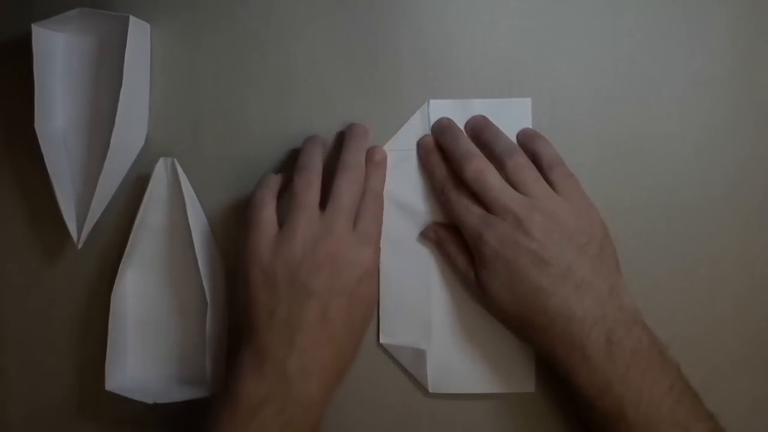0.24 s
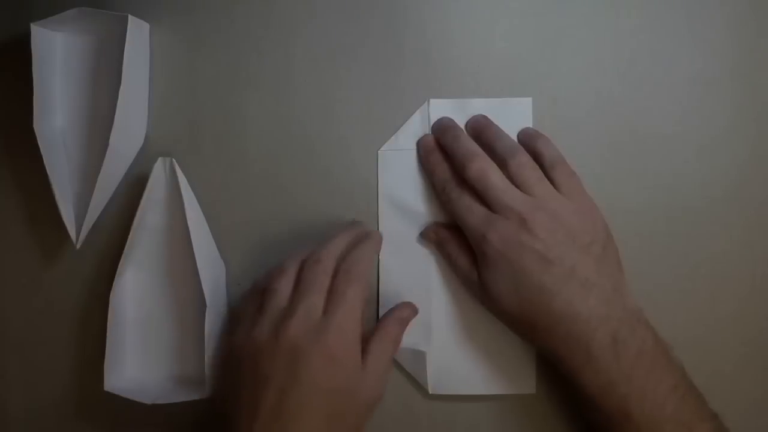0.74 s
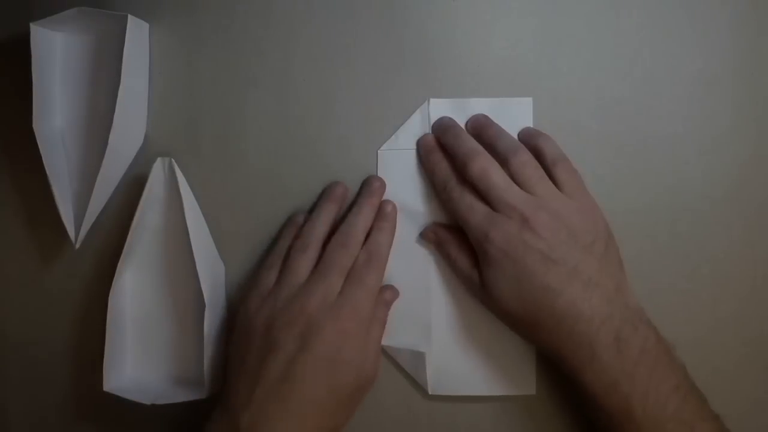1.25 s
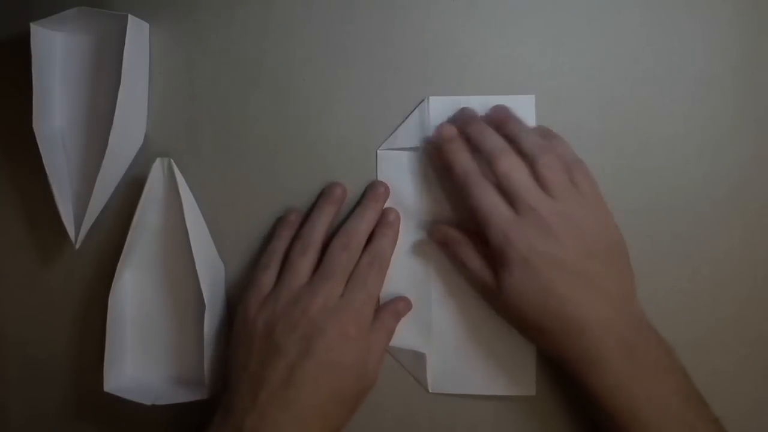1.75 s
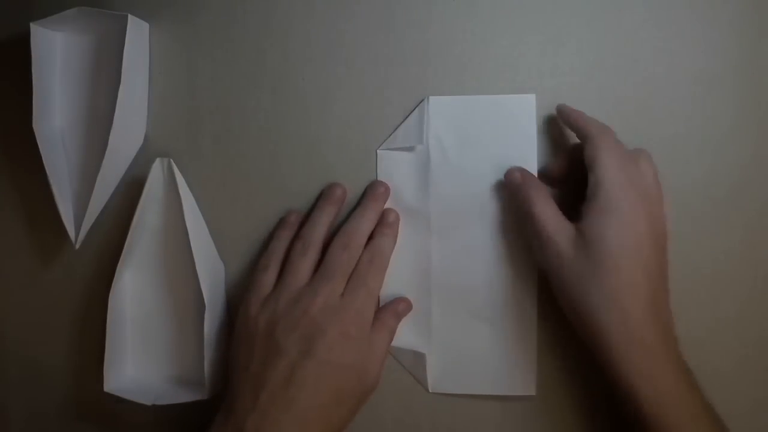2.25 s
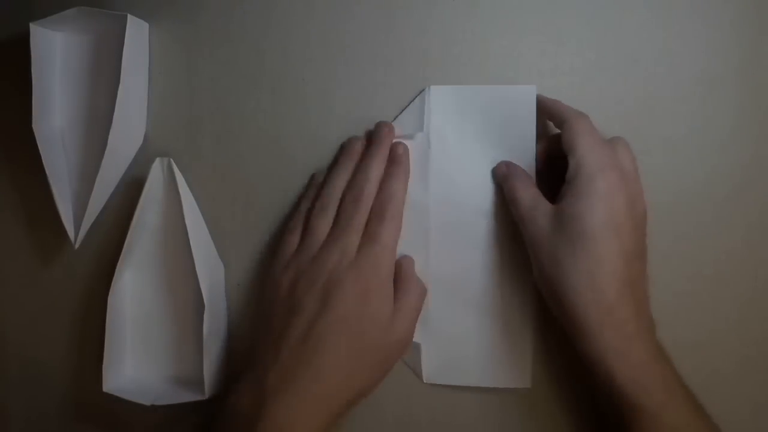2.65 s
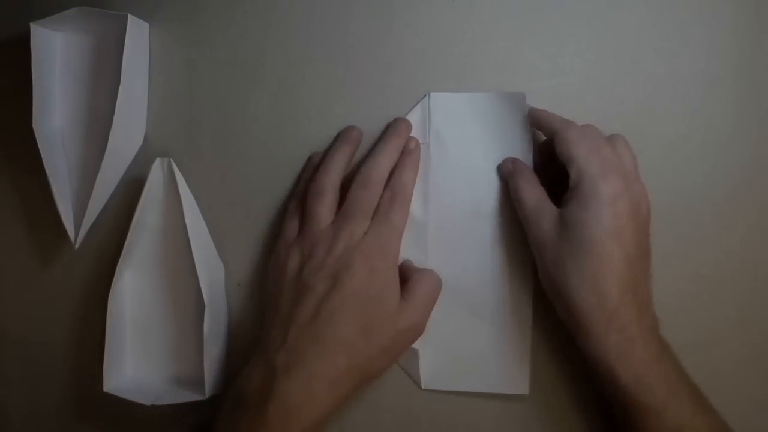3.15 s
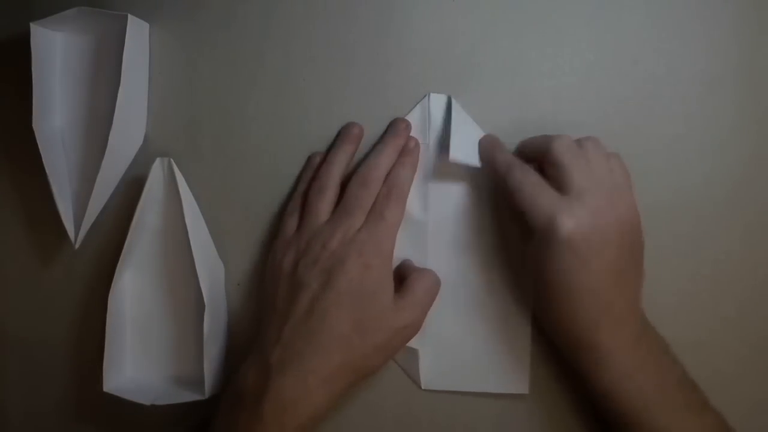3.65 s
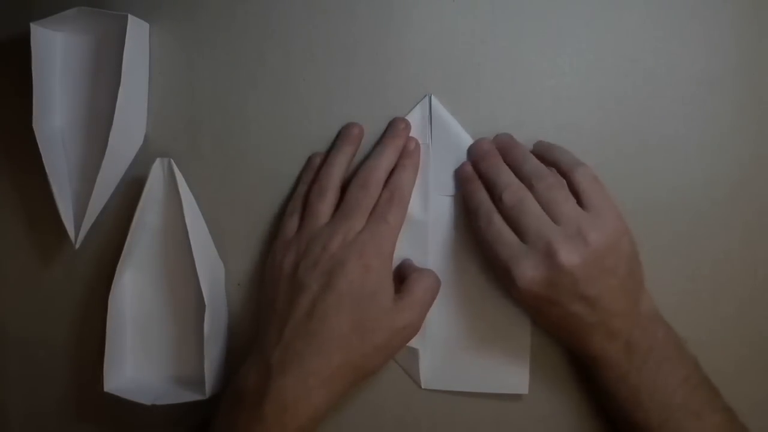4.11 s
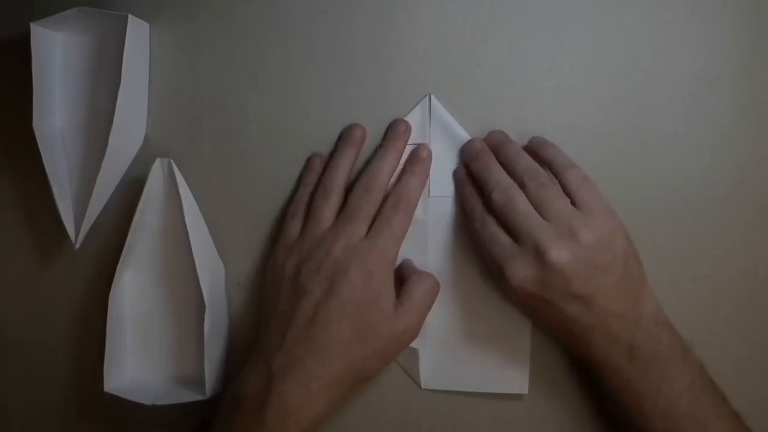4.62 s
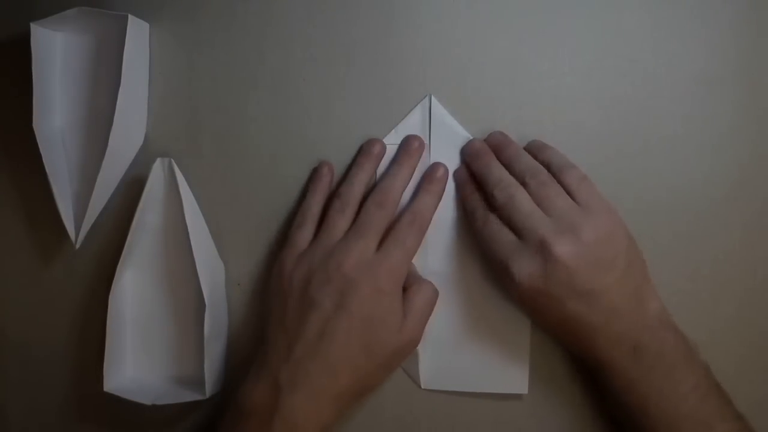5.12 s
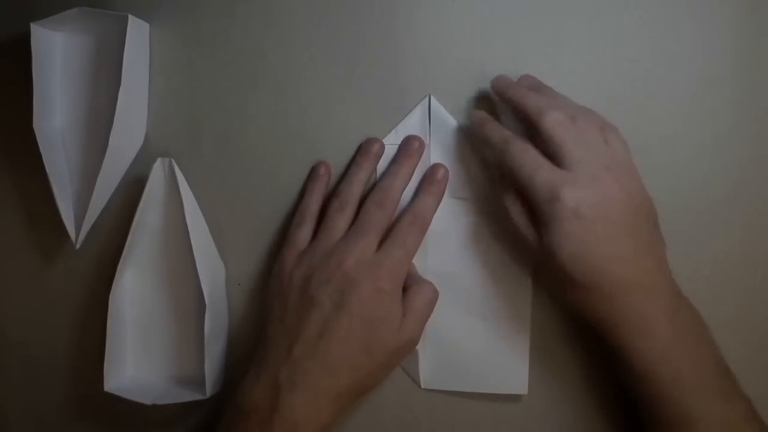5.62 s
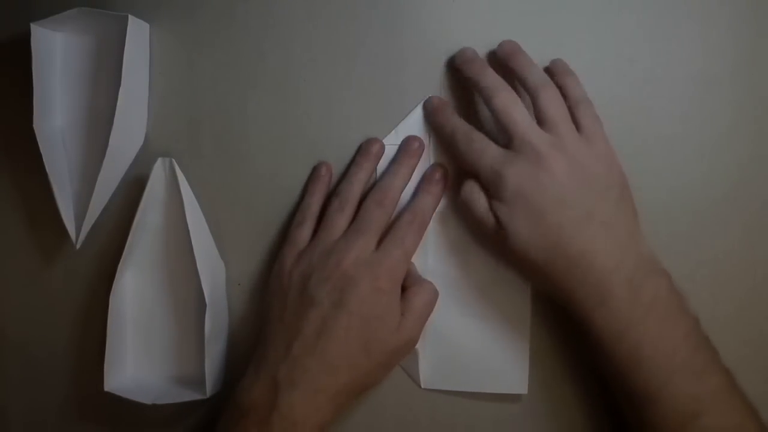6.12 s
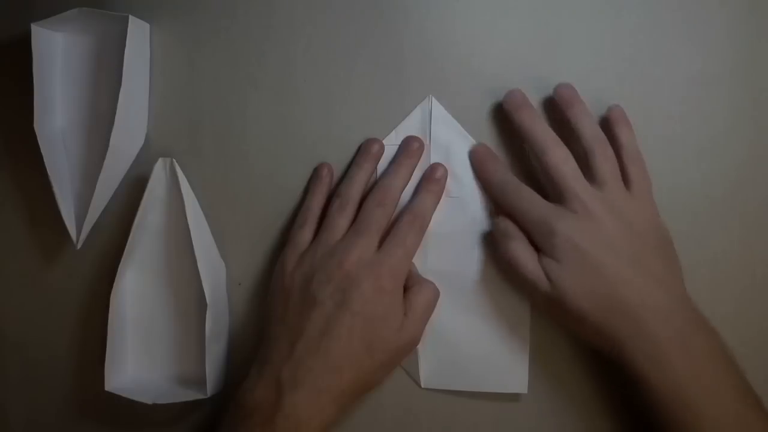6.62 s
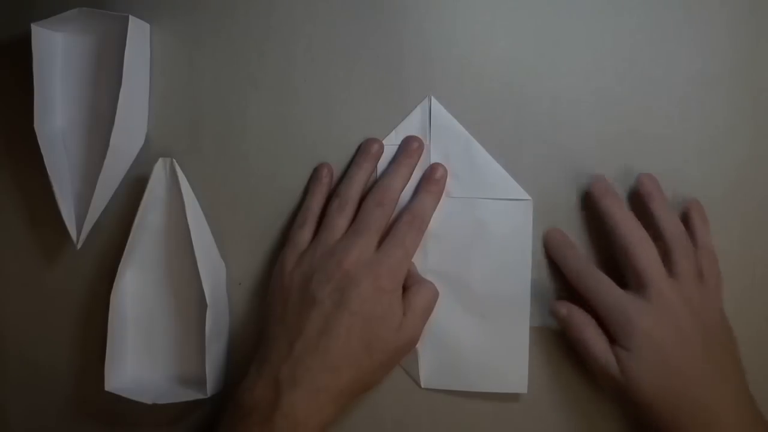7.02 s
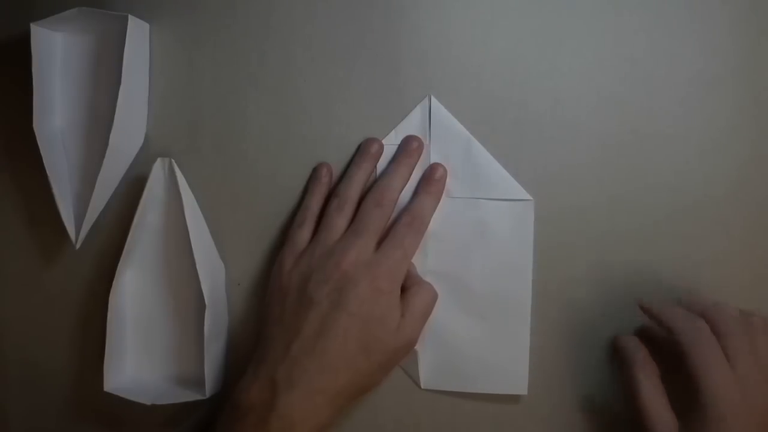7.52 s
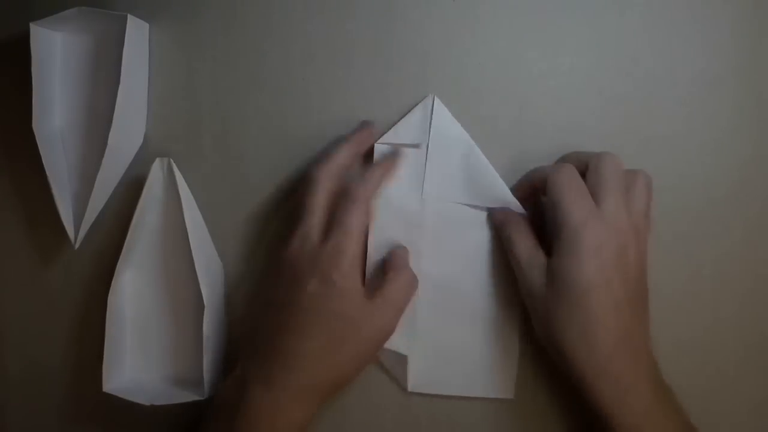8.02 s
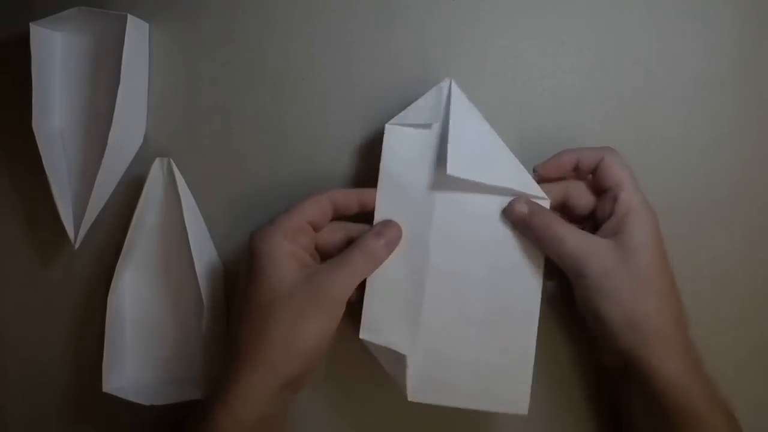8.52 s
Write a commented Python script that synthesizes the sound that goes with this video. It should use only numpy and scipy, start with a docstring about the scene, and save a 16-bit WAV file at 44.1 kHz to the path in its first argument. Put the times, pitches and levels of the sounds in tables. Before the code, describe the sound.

Hands fold a sheet of paper on a table. Skin slides over it in irregular, finely hissing strokes while fingertips thump the table top softly. A crease buckles with a sharp snap, followed by a faint thin whistle and small crackles. Two more sharp snaps come later, the last leading into a long slide and short finishing strokes. The sound is close, over a low room rumble and soft microphone hiss.

```python
"""Hands fold a sheet of paper on a table, while the room rumbles and the microphones hiss softly.
First, skin slides over the paper with a fine hiss and fingertips thump the table top.
Near 1.8 s a crease buckles with a sharp snap; a thin whistle and small crackles follow.
Another sharp snap at 3.9 s leads into lighter rubbing. At 6.5 s a snap and a thump start a long
slide, and short strokes and small snaps finish the folding."""
import sys
import numpy as np
from scipy import signal
from scipy.fft import rfft, irfft, next_fast_len
from scipy.io import wavfile
from scipy.ndimage import uniform_filter1d, map_coordinates

SR = 44100
rng = np.random.default_rng(int(sys.argv[2]) if len(sys.argv) > 2 else 0)


def put_to_file(sound):
    """Save the sound as 16-bit audio at rate SR, in the file named by the first command-line argument."""
    columns = np.atleast_2d(sound).T  # one column per channel
    safe = np.clip(columns, -1, 1)
    whole_steps = np.round(safe * 32767)
    wavfile.write(sys.argv[1], SR, whole_steps.astype(np.int16))


N = 386316

# Strokes over the paper: t/s on reaching full level, rise/s, hold/s, fall/s, hiss level/dB,
# then, compared with that hiss: lower hiss/dB, sheet flutter/dB, table drone/dB
STROKES = [(.01, 0.027, .01, .04, -60, -5, -7, -10), (0.207, .1, .02, 0.056, -65.5, -5, -7, 11.5),
           (0.284, 0.053, 0.067, .06, -51.5, -9, -10, -4), (0.369, .08, 0.08, 0.028, -48, -9.5, -8, -3),
           (.844, .05, .004, 0.037, -53.5, -1, -15, -17), (0.918, 0.09, 0.047, .11, -64, 0, -2, 10),
           (1.334, 0.015, .035, .07, -54, -2, 3.5, 7.5), (1.494, .07, 0.13, .03, -55.5, -17, -8, -5),
           (1.728, 0.042, .005, 0.027, -40, -6, -13, -11.5), (1.758, .005, .003, 0.085, -48, 5, -7, 8),
           (2.16, 0.034, 0.034, .05, -57, -6, 4.5, 7.5), (2.225, 0.096, .01, 0.048, -49.5, -4, 2.8, -9),
           (2.324, 0.14, 0.065, 0.17, -56, -1, 0.8, -0.5), (2.443, 0.019, 0.06, 0.034, -42.5, -8, -4, -12),
           (2.533, .03, 0.045, 0.29, -49.5, -18, -2.5, -2.5),
           (2.688, 0.055, 0.0034, 0.034, -35, -5, -8.5, -12.5),
           (2.794, 0.15, 0.064, 0.14, -48.5, -2.5, -1, -5.5),
           (2.948, 0.052, .004, 0.039, -43, -5, -4.5, -12), (3.044, 0.048, 0.0092, .15, -53, 1.5, -9, -3),
           (3.22, .02, .003, 0.035, -59, -6, -11, 0), (3.328, 0.014, .004, 0.08, -38.5, -8.5, -0.5, -6.5),
           (3.388, .05, .004, 0.04, -45, -8, -3, -15), (3.444, .008, 0.046, .11, -45, -10, -7.5, -14),
           (3.521, 0.095, 0.012, 0.036, -38.5, -6.5, -27, -26),
           (3.58, 0.034, 0.0037, 0.068, -51, 4.5, 6.8, 6),
           (3.688, 0.026, 0.0088, 0.065, -41.5, -13, -13, -25),
           (3.827, 0.12, .004, 0.052, -53.5, -5, -4, -12), (3.903, .005, .004, 0.12, -45, -3, 4, -7),
           (4.042, .04, 0.025, 0.19, -53, -5.5, -2.2, -10), (4.152, 0.05, .004, 0.13, -53, -7, -3, -15.5),
           (4.254, .03, .004, .06, -54, -14, -18, -9), (4.345, .03, 0.046, .11, -55.5, -6.5, -5, -9),
           (4.456, .05, 0.056, 0.34, -49.5, -7.5, -6, -14), (4.747, 0.061, .004, .06, -49, -6, -6, -19),
           (4.878, 0.18, .004, 0.072, -44.5, -12, -7.5, -8.5),
           (5.044, 0.061, .004, 0.048, -60.5, -11, 9, 2.2),
           (5.194, 0.085, .01, 0.078, -48.5, -1, -6.5, -24), (5.345, .11, .01, 0.056, -50, -5.5, -12, -13),
           (5.4, .005, 0.0067, .03, -39.5, -12, -19, -21), (5.447, 0.045, .015, 0.047, -56, 0, -16, -11),
           (5.753, .008, .02, .03, -45, -6.5, -11, -10), (5.788, 0.035, 0.034, 0.037, -36, -14.5, -23, -25),
           (5.844, .03, .08, 0.071, -42.5, -4, -19.5, -20), (5.985, .06, .008, 0.014, -38.5, -4, -16, -23),
           (6.01, 0.039, 0.061, 0.056, -55, 4.5, -.8, 1), (6.364, .07, 0.097, .03, -45, -5, -17, -13),
           (6.47, 0.009, .004, 0.11, -37.5, -15, -4, 1), (6.553, 0.15, .004, 0.24, -37, -5, -9, -12.5),
           (6.66, .11, 0.14, .4, -42.5, -15, -19, -14), (6.9, 0.14, .11, 0.064, -48.5, -5.5, -2.5, -1),
           (7.04, .03, 0.036, 0.044, -52, -9, -2, 3.5), (7.097, .05, 0.026, .03, -46.5, -5.5, -13, -17),
           (7.644, 0.0045, .004, 0.037, -42.5, -13, -25, -13), (7.845, 0.29, 0.044, .11, -54, -7, -2.5, 0),
           (7.926, 0.053, .004, 0.073, -46, -6, -6, -5), (7.97, .05, .02, .02, -46.5, -5, -7, -6),
           (7.995, .012, 0.017, 0.041, -34.5, -2, -12, -24), (8.062, 0.055, .004, .15, -49, -2.5, -6, -12),
           (8.193, 0.08, 0.014, 0.13, -44, 0, -1.2, -20.5),
           (8.326, 0.096, .15, 0.065, -44.5, -4.5, -4.5, -8.5),
           (8.53, 0.045, .004, 0.049, -43.5, 1.2, -6, -20), (8.565, 0.022, 0.066, .04, -54, -2, -4, 5.5),
           (8.686, 0.017, .004, 0.058, -52.5, -14, -11, 8.5)]
def stroke_gains():
    """Loudness of the four sliding layers: each stroke swells, holds and fades; overlaps add in power."""
    swing_db = 20  # gained over one rise time, lost over one fall time
    t, power = np.arange(0, N + 64, 64) / SR, 0
    for start, rise, hold, fall, db, *relative_db in STROKES:
        before = (start - t) / max(rise, 1e-3)
        after = (t - start - abs(hold)) / max(fall, 1e-3)
        drop_db = swing_db * np.maximum(before, after).clip(0, 8)
        power = power + amp(db + np.array([0, *relative_db])[:, None] - drop_db) ** 2
    return [np.interp(np.arange(N) / SR, t, np.sqrt(row)) for row in power]


# Tone of the skin's hiss, its lower part, the fluttering sheet and the droning table: f/Hz, level/dB
SKIN_HISS = [(2650, -37), (4500, -9), (7260, 1.5), (8780, 2.5), (13400, -1.5), (15100, -7.5), (15900, -14),
             (16200, -18), (16500, -57)]
LOWER_HISS = [(2500, -15), (3500, -5.5), (4500, -2), (6000, -6.5), (8000, -11.5)]
SHEET_FLUTTER = [(700, -8), (1200, -1), (2000, -3), (3300, -4.5), (5000, -6)]
TABLE_DRONE = [(120, 3), (250, 1), (600, -0.5), (1100, -6.5), (1800, -41.5)]
# How alike the paper sounds left and right: f/Hz, likeness (1 = the same)
PAPER_ALIKE = [(300, 1), (1400, 0.69), (3100, 0.62), (7000, 0.3), (15000, 0.029)]
def sliding():
    """Skin catches on paper fibres in tiny slips; the stroke also shakes the sheet and the table."""
    slips = amp(0.78 * wobble(700) + 0.8 * wobble(60))
    hiss = unit(slips * rush(SKIN_HISS, PAPER_ALIKE, patchy_db=1.4))
    lower = unit(slips * rush(LOWER_HISS, PAPER_ALIKE, patchy_db=3.0))
    flutter = unit(slips * rush(SHEET_FLUTTER, PAPER_ALIKE, patchy_db=2.5))
    drone = rush(TABLE_DRONE, PAPER_ALIKE, patchy_db=3.0)
    return sum(gain * layer for gain, layer in zip(stroke_gains(), (hiss, lower, flutter, drone)))


SCATTER_DB = 1.5  # how much each ringing note varies from one snap or thump to the next
# Notes at which the folded sheet rings: f/Hz, level/dB, time to fade by 60 dB/s
SHEET_NOTES = [(534, -17, .04), (825, 4.5, 0.081), (1056, 4.5, 0.029), (1480, 11, 0.01), (1890, -4, 0.025),
               (2255, 0.5, 0.029), (2930, -2, 0.019)]
# Snapping creases: t/s, crack level/dB, ring over crack before its lift/dB,
# ring f/Hz, crack f/Hz, crack fade time/s
SNAPS = [(0.117, -37.5, -26, 1020, 10100, 0.0077), (0.205, -29.5, -13, 1020, 11200, 0.0087),
         (0.815, -45, -17, 966, 6190, 0.006), (1.327, -39, -19, 950, 11400, 0.0053),
         (1.351, -23, -6, 1430, 2630, 0.018), (1.5014, -46.5, -2, 1050, 10100, 0.006),
         (1.701, -32.5, -16, 1700, 5230, 0.006), (1.7557, -9, -22, 1550, 8000, 0.0085),
         (2.156, -41, -5, 2340, 6870, 0.0054), (2.481, -36, -25, 1570, 8430, 0.006),
         (2.497, -26, -24, 1340, 8450, 0.006), (2.51, -35.5, 2.5, 1150, 8560, 0.0066),
         (2.65, -41, -24, 2180, 11500, 0.006), (2.786, -30, -30, 950, 7590, 0.007),
         (2.808, -25.5, -26, 980, 8280, 0.0048), (2.821, -43, 3.5, 820, 3000, .006),
         (2.837, -24.5, -7.5, 2150, 2510, 0.0016), (3.052, -29, -15, 2410, 8300, 0.0067),
         (3.2195, -32.5, -25, 1060, 7100, 0.0063), (3.3236, -29, -12.5, 1180, 4130, 0.0093),
         (3.325, -22.5, -8.5, 1830, 10700, 0.0098), (3.44, -37, -21, 1870, 8260, 0.006),
         (3.575, -30.5, -18, 2100, 4130, 0.0062), (3.594, -38, -0.5, 2410, 3500, 0.0053),
         (3.9003, -8.5, -15, 1560, 6200, 0.013), (4.16, -29, -34, 1300, 10200, 0.006),
         (4.252, -32.5, -29, 1050, 10300, 0.011), (5.039, -41.5, -11, 1110, 8110, 0.0073),
         (5.3951, -26, -35.5, 950, 10800, 0.0085), (5.995, -33, -11.5, 1070, 6450, 0.006),
         (6.027, -29.5, -15, 1850, 4100, 0.0096), (6.4738, -13.5, -11.5, 1430, 6060, 0.016),
         (6.553, -22, -22, 1240, 8170, 0.006), (6.604, -28.5, -11, 1010, 9750, 0.006),
         (7.005, -29, -24, 2300, 5000, 0.0048), (7.532, -42, -13, 1020, 8600, 0.006),
         (7.643, -24.5, -29, 1010, 6950, 0.011), (7.778, -40, -0.5, 1550, 3400, 0.008),
         (7.902, -31, -17, 1380, 8730, 0.0066), (7.9194, -29.5, -24, 1040, 12700, 0.016),
         (7.993, -29, -23, 2250, 8690, 0.006), (8.052, -37, -20, 1500, 5000, .006),
         (8.4165, -41, -1.5, 1500, 9420, 0.006), (8.529, -24.5, -19, 1050, 7400, 0.0074),
         (8.5454, -26.5, 3, 1090, 4000, 0.014), (8.692, -37, 1.5, 1400, 3900, 0.0069)]
def snaps():
    """A crease buckles: a broad crack, and a brief ring of the sheet's notes near the ring frequency."""
    ring_lift_db = 5.5
    out, t = np.zeros((2, N + SR)), np.arange(SR // 10) / SR
    for start, db, ring_db, ring_hz, crack_hz, crack_fade in SNAPS:
        common, left, right = rng.standard_normal((3, len(t)))
        decay = amp(-60 * t / max(crack_fade, 1e-3)) + 0.81 * amp(-60 * t / 0.00059)
        attack = 1 - np.exp(-t / 0.0001)
        burst = (common + 0.85 * np.array([left, right])) * decay * attack
        crack = filtered(burst, lambda hz: resonance(hz, crack_hz, 0.87 * crack_hz)
                         * resonance(hz, centre_hz=5160, width_hz=7900))
        ring = 0
        for hz, level, fade in SHEET_NOTES:
            note_db = level + rng.normal(0, SCATTER_DB) - 18 * abs(np.log2(hz / ring_hz))
            note_hz = hz * (1 + rng.normal(0, 0.043))
            ring += amp(note_db - 60 * t / fade) * np.sin(2 * np.pi * note_hz * t)
        crack /= np.abs(crack.mean(0)).max()
        ring *= amp(ring_db + ring_lift_db) / np.abs(ring).max()
        out[:, round(start * SR):][:, :len(t)] += amp(db) * (crack + ring)
    return out[:, :N]


# Notes at which the table top rings: f/Hz, level/dB, time to fade by 60 dB/s
TABLE_NOTES = [(108, 3.5, .12), (161, 5.5, 0.064), (220, 6, 0.054), (315.6, 4.5, 0.062), (469, -4.5, 0.12),
               (548.5, 0.5, 0.048), (730, -14, .05), (873, -18.5, 0.038)]
# Fingertips landing: t/s, peak level/dB, sharpness/dB per octave above 200 Hz
THUMPS = [(0.115, -32.5, -1.5), (0.205, -40.5, 2), (0.438, -28, -3), (1.351, -32, 4.5),
          (1.502, -38.5, -1.5), (1.753, -29, 2.5), (2.512, -38, -9), (3.055, -38.5, -12), (3.221, -39, -7),
          (3.804, -42, 0), (3.9, -37.5, -1), (5.612, -38, -11), (6.003, -37.5, 1), (6.026, -36.5, 0.5),
          (6.472, -24.5, 8), (6.603, -32, -4), (7.994, -36, -7)]
def thumps():
    """A fingertip makes the table ring; sharper blows bring out the higher notes."""
    out, t = np.zeros(N + SR), np.arange(SR // 4) / SR
    for start, db, sharp_db in THUMPS:
        ring = 0
        for hz, level, fade in TABLE_NOTES:
            note_db = level + rng.normal(0, SCATTER_DB) + sharp_db * max(np.log2(hz / 200), 0)
            ring += amp(note_db - 60 * t / fade) * np.sin(2 * np.pi * hz * t)
        ring *= 1 - np.exp(-t / 0.0022)  # soften the start
        out[round(start * SR):][:len(t)] += amp(db) * ring / np.abs(ring).max()
    return out[:N]


# Path of the sheet's whistle: t/s, f/Hz, level/dB
WHISTLE = [(2.09, 7700, -80), (2.11, 7780, -68), (2.15, 8000, -67), (2.17, 7700, -80), (2.2, 7300, -59),
           (2.24, 7400, -59), (2.27, 7600, -80), (2.55, 8200, -80), (2.58, 8500, -58), (2.61, 8800, -57),
           (2.67, 8350, -57), (2.74, 7900, -59), (2.77, 7800, -80)]
def whistle():
    """The sliding sheet gives a thin, fuzzy tone that glides in pitch."""
    hz, db = curves(WHISTLE)
    t = np.arange(N) / SR
    sounding = (t > WHISTLE[0][0]) & (t < WHISTLE[-1][0])
    gain = sounding * amp(db + 4.5 * wobble(74))
    return gain * tone(hz + 90 * wobble(300))


# How long the room echoes: f/Hz, time to fade by 60 dB/s
ECHO_FADES = [(200, 0.16), (1400, 0.26), (3700, 0.19), (9700, 0.11)]
def wall_echo(x):
    """The walls send the sound back, and each frequency dies away at its own speed."""
    hz, t, noise = signal.stft(rng.standard_normal((2, SR // 2)), SR, nperseg=128)
    tail = signal.istft(noise * amp(-60 * t / along(ECHO_FADES, hz)[:, None]), SR, nperseg=128)[1]
    delayed = np.pad(x, ((0, 0), (90, 0)))  # about 2 ms
    return signal.fftconvolve(delayed, tail / np.linalg.norm(tail[0]), axes=1)[:, :N]


# Tone of the building's rumble, the table's flexing and the microphones' hiss: f/Hz, level/dB
RUMBLE = [(65, -28), (110, -3), (204, -1), (287, -7), (319, -5), (350, -9), (398, -9), (427, -9),
          (572, -12), (628, -16), (758, -13), (1800, -28.5), (2340, -62), (3960, -120)]
FLEX_TONE = [(30, -31), (52, 8), (70, -2), (100, 3), (140, -27.5)]
MIC_HISS = [(1410, -39), (2400, -11), (6790, -2.5), (7020, -4.5), (9530, -4), (15200, -3.5), (16100, -8),
            (16500, -19)]
# How loudly the table flexes: t/s, level/dB
FLEX_LEVELS = [(0.0, -63), (0.14, -52.5), (0.17, -52), (0.49, -53.5), (0.61, -54.5), (1.68, -55.5),
               (1.76, -52), (1.8, -54), (2.34, -59), (2.41, -46.5), (2.93, -57.5), (3.05, -49),
               (3.56, -57.5), (6.42, -54.5), (6.46, -56), (6.66, -56), (8.71, -53), (8.76, -57)]
# How alike the room sounds left and right: f/Hz, likeness (1 = the same)
ROOM_ALIKE = [(30, 0.83), (130, 0.8), (640, 0.53), (1400, 0.16), (3000, 0.037)]
def quiet_room():
    """The building rumbles over a very deep throb, the table slowly flexes and the microphones hiss."""
    rumble_db, throb_db, hiss_db, throb_hz = -52.5, -54.5, -60, 24
    rumble = amp(rumble_db + 2.2 * wobble(2.896)) * rush(RUMBLE, ROOM_ALIKE, patchy_db=0.93)
    throb = amp(throb_db + 3.2 * wobble(5)) * tone(throb_hz + wobble(4.2))
    flex = amp(curves(FLEX_LEVELS)[0]) * rush(FLEX_TONE, ROOM_ALIKE, patchy_db=1.0)
    hiss = amp(hiss_db) * rush(MIC_HISS, alike=[(5000, 0.016)], patchy_db=0.2)
    return rumble + throb + flex + hiss


def amp(db):
    """Turn decibels into a number to multiply by."""
    return 10 ** (np.asarray(db) / 20)


def unit(x):
    """Scale x to an average strength (rms) of 1."""
    return x / np.sqrt(np.mean(x ** 2) + 1e-20)


def along(points, hz):
    """Read between the rows of a (frequency, value) table, with octaves evenly spaced."""
    freqs, values = np.transpose(points)
    return np.interp(np.log(hz + 1), np.log(freqs + 1), values)


def curves(rows):
    """Give each column after the time one value per sample."""
    times, *columns = np.transpose(rows)
    return [np.interp(np.arange(N) / SR, times, column) for column in columns]


def wobble(rate):
    """A smooth curve through `rate` random values a second."""
    return map_coordinates(rng.standard_normal(int(N * rate / SR) + 4), [np.arange(N) * rate / SR])


def tone(hz):
    """A pure tone that follows a changing pitch."""
    return np.sin(2 * np.pi * np.cumsum(hz) / SR)


def filtered(x, response):
    """Turn each frequency of x up or down by response(hz)."""
    size = next_fast_len(x.shape[-1] + 8192)
    return irfft(rfft(x, size) * response(np.fft.rfftfreq(size, 1 / SR)), size)[..., :x.shape[-1]]


def resonance(hz, centre_hz, width_hz):
    """A filter shape that favours frequencies near its centre."""
    return 1j * hz * width_hz / (centre_hz ** 2 - hz ** 2 + 1j * hz * width_hz)


def rush(spectrum, alike, patchy_db):
    """Stereo noise of strength 1, with louder and softer patches across time and pitch."""
    noise = signal.stft(rng.standard_normal((2, N)), nperseg=256)[2]
    patches = uniform_filter1d(uniform_filter1d(rng.standard_normal(noise.shape[1:]), 5, 0), 10, 1)
    pair = signal.istft(noise * amp(patchy_db * unit(patches)), nperseg=256)[1][:, :N]

    def shape(hz):
        angle = np.arccos(np.clip(along(alike, hz), -1, 1)) / 2  # 0 makes left and right the same
        return amp(along(spectrum, hz)) * [np.cos(angle), np.sin(angle)]
    mid, side = filtered(pair, shape)
    return unit(np.array([mid + side, mid - side]))


# How much louder nearby sounds are at the left microphone: f/Hz, level over the right/dB
LEFT_LEAN = [(500, 1), (2500, 0), (5000, 0.5), (8500, 4), (13000, 2.5)]
def scene():
    """Mix the hands and paper, the echo of their snaps and thumps, and the quiet room."""
    hits = snaps() + thumps()
    near = hits + amp(-10.5) * wall_echo(hits) + sliding() + whistle()
    near = filtered(near, lambda hz: amp(along(LEFT_LEAN, hz) * [[.5], [-.5]]))
    return near + quiet_room() * amp([[.4], [-.4]])


def record(dry):
    """The camera cuts off the very highest treble."""
    top_hz = 15850
    return filtered(dry, lambda hz: hz < top_hz)


dry = scene()
out = record(dry)
put_to_file(out)
```